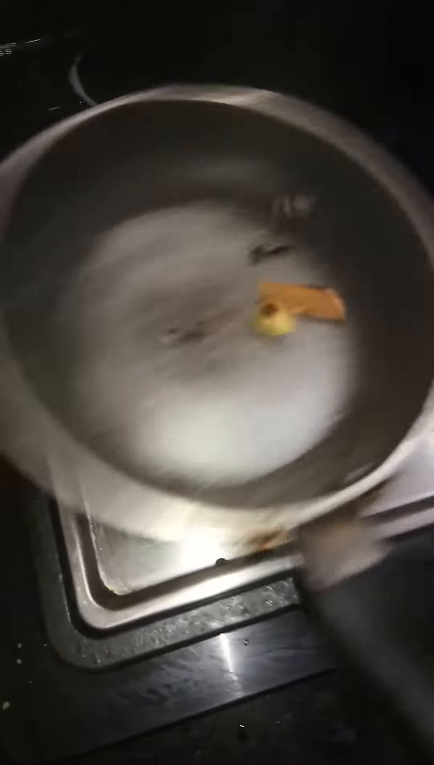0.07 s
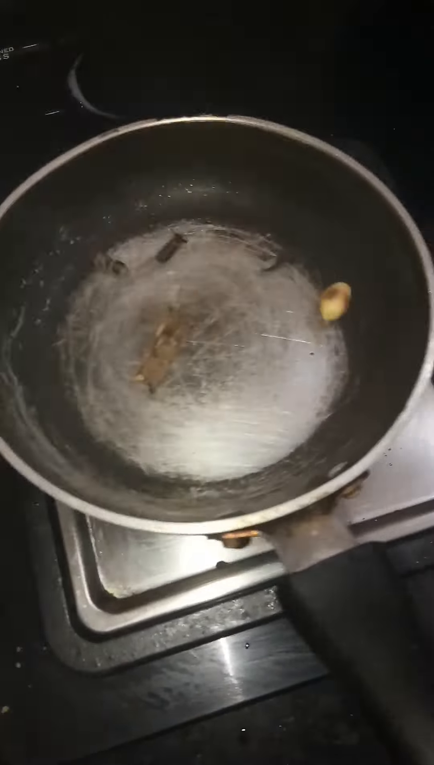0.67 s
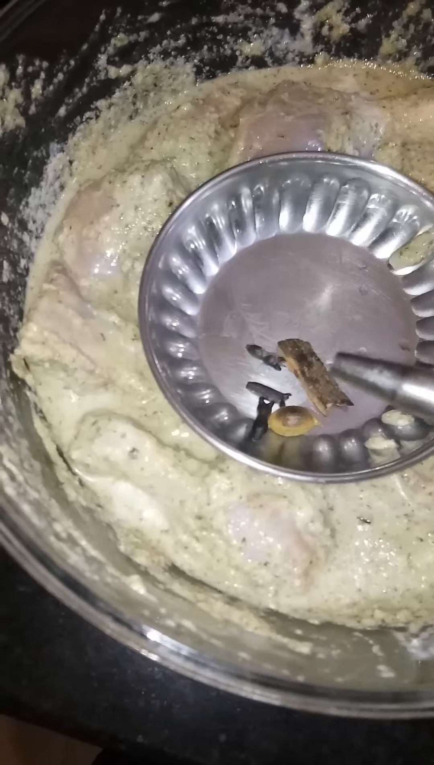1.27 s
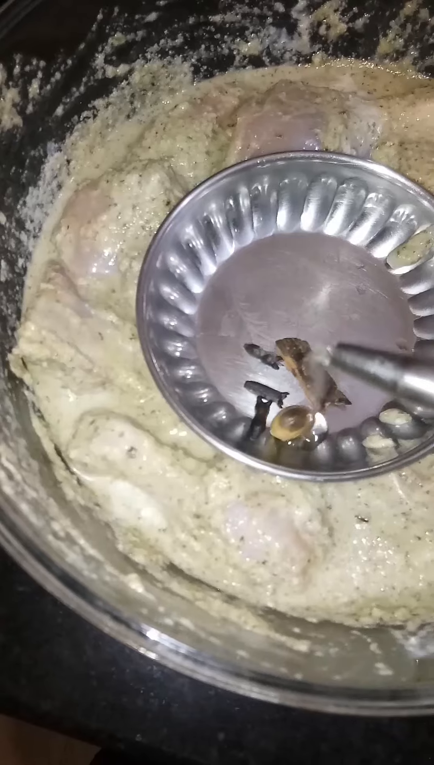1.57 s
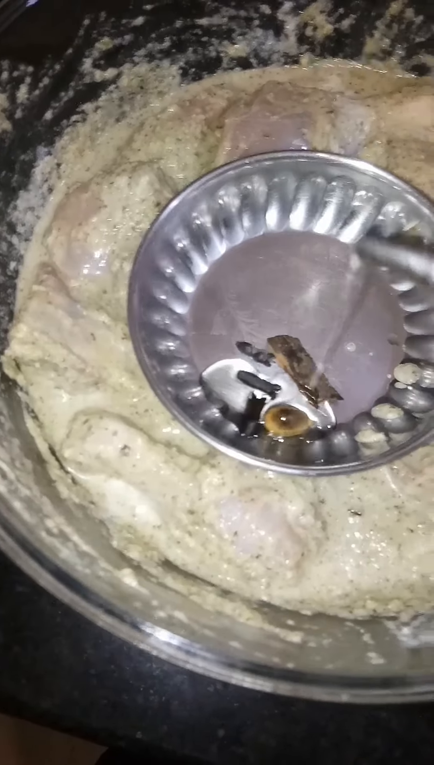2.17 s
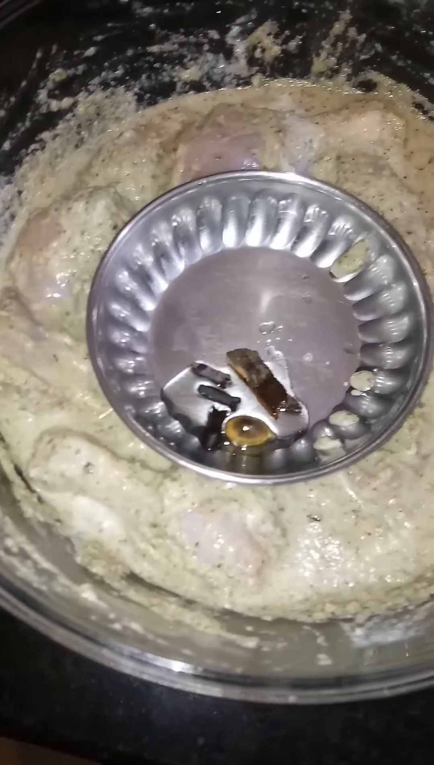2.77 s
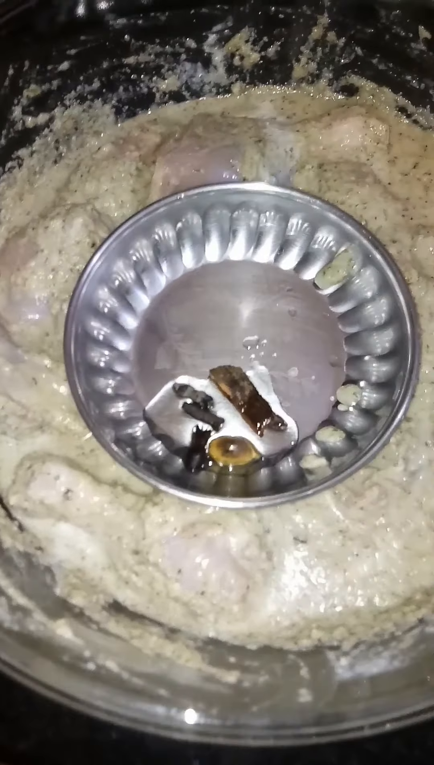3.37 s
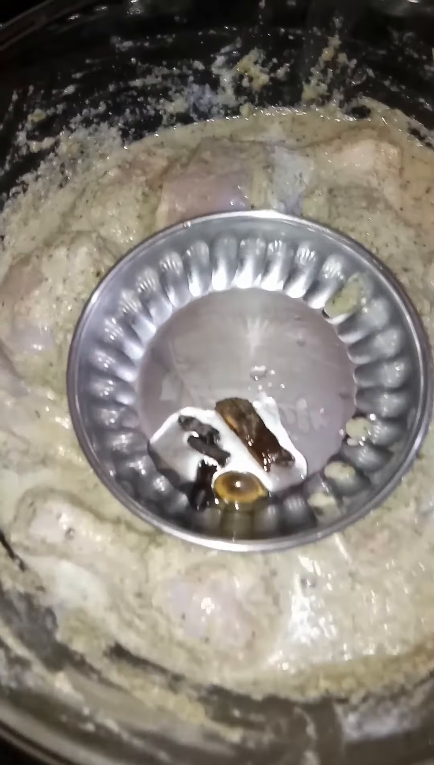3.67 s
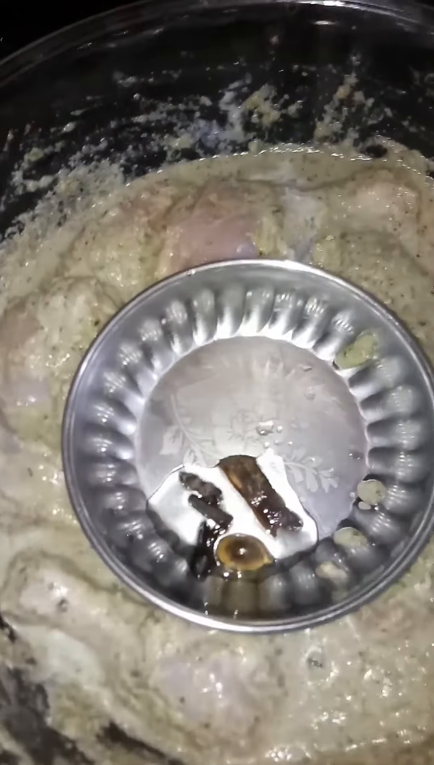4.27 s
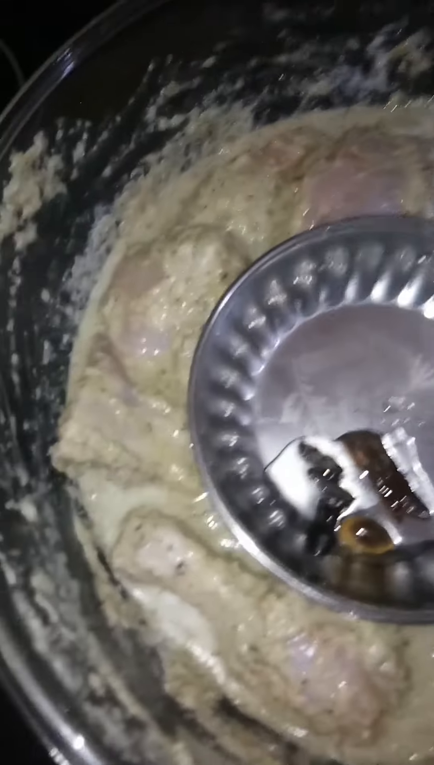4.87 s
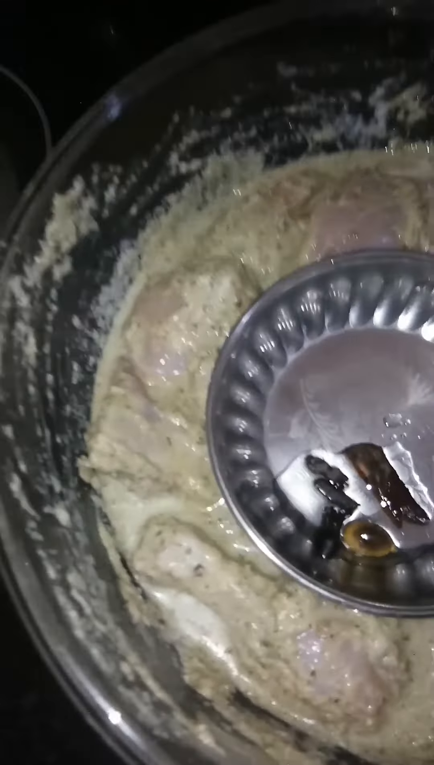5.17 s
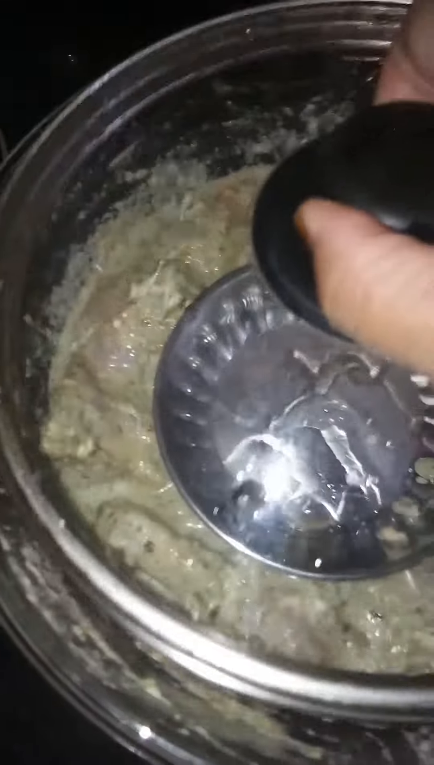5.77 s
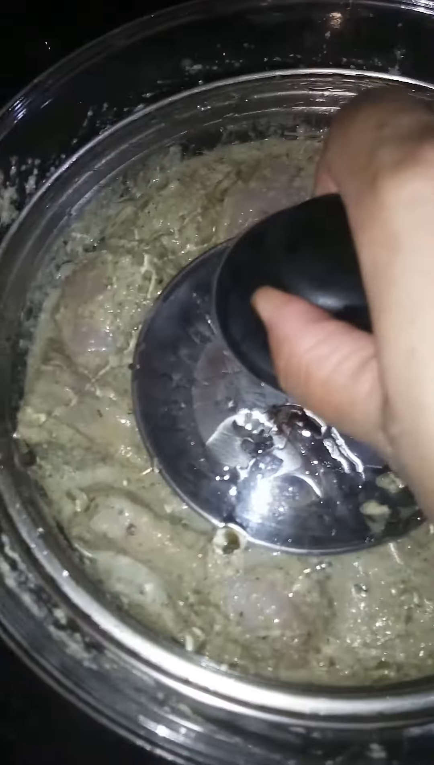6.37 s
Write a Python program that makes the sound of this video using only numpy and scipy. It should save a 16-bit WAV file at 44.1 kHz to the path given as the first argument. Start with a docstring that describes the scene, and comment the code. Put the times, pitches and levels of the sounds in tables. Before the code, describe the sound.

Whole spices tick and skitter in a frying pan, which clanks onto the hob before the sound briefly cuts out. A low, fan-like hum carries on alone until something hard knocks loudly on the counter. A heavy glass bowl clinks and rocks with dull thuds, then a lid is picked up and laid on it with a short clatter. Everything sounds close, in a small kitchen with a short echo.

```python
"""Cookware in a small kitchen

Over a low hum, whole spices tap in a frying pan, which is set on the hob; the sound cuts out briefly.
Something hard is put down on the counter, a heavy glass bowl is shifted, rocks and clinks, and a lid
is picked up and laid on it. Each blow is a dull thud, a clear ring and a faint high shimmer.
The room rings after each, and a limiter holds down the loudest."""
import sys
import numpy as np
from scipy import signal
from scipy.fft import rfft, irfft
from scipy.io import wavfile
from scipy.ndimage import uniform_filter1d, minimum_filter1d

SR = 44100
rng = np.random.default_rng(int(sys.argv[2]) if len(sys.argv) > 2 else 0)


def generate_wav(sig):
    """Save sig (samples, or channels by samples) to the path in sys.argv[1] as 16-bit PCM at SR."""
    pcm = np.round(np.clip(np.atleast_2d(sig).T, -1, 1) * 32767).astype(np.int16)
    wavfile.write(sys.argv[1], SR, pcm)


N = 291942
TIME = np.arange(N) / SR


def amp(db):
    """Decibels to gain."""
    return 10 ** (np.asarray(db) / 20)


def unit(x):
    """Scales to an energy of one."""
    return x / np.sqrt(np.sum(x ** 2) + 1e-20)


def curve(points, hz):
    """Reads a table on a log-frequency axis."""
    f, value = np.transpose(points)
    return np.interp(np.log(hz + 1), np.log(f + 1), value)


def add(mix, s, sound):
    """Mixes a sound in at s seconds."""
    part = mix[max(round(s * SR), 0):][:len(sound)]
    part += sound[:len(part)]


def noise(gain):
    """Steady noise of rms 1, shaped by a gain at each frequency."""
    return np.sqrt(N) * unit(irfft(rfft(rng.standard_normal(N)) * gain, N))


def coloured(x, colour, tilt, size=2048):
    """Minimum-phase EQ, tilted about 1.5 kHz in dB per octave."""
    hz = abs(np.fft.fftfreq(size, 1 / SR))
    gain = amp(curve(colour, hz) + tilt * np.log2((hz + 100) / 1500))
    low_cut = (hz + 1) / np.hypot(hz, 100)
    response = np.exp(np.conj(signal.hilbert(np.log(gain * low_cut))))
    return signal.fftconvolve(x, np.fft.ifft(response).real)[:len(x)]


def decaying_noise(t60_at, size, bands=8):
    """A burst of noise, each band dying at its own speed."""
    t, hz = np.arange(size) / SR, np.fft.rfftfreq(size, 1 / SR)
    spectrum = rfft(rng.choice([-1., 1.], size))
    centres = np.geomspace(125, 16000, bands)
    shares = [curve(np.c_[centres, band], hz) for band in np.eye(bands)]
    return sum(irfft(spectrum * share, size) * np.exp(-np.log(1000) * t / t60_at(f))
               for f, share in zip(centres, shares))


# The drone's resonances. Each row: pitch in Hz, width in Hz, level in dB.
HUM_TONES = [(73.5, 3.2, -49), (100.7, 5.3, -44.5), (86.7, 49, -53), (118.4, 22, -48), (185.5, 20, -60.5),
             (29.3, 18, -64.5)]
# The air's colour. Each row: frequency in Hz, relative level in dB.
AIR_COLOUR = [(82, -38.5), (140, -1.5), (174, -0.5), (254, -10), (349, -5), (508, -8.5), (550, -5.5),
              (939, -8), (1150, -8.5), (1510, -16), (2290, -17.5), (6300, -36.5), (7990, -48),
              (15100, -53.5), (16000, -55)]

def hum(air_db=-46.5):
    """A fan-like bed: narrow, beating low resonances under a soft rush of air."""
    hz = np.fft.rfftfreq(N, 1 / SR)
    drone = sum(amp(db) * noise(1 / (1 + (2 * (hz - f) / width) ** 2)) for f, width, db in HUM_TONES)
    return drone + amp(air_db) * noise(amp(curve(AIR_COLOUR, hz)))


# The room's decay. Each row: frequency in Hz, t60 in seconds.
ROOM_T60 = [(150, 0.56), (500, 0.3), (2000, 0.29), (5000, .34), (12000, 0.16)]

def kitchen_reverb(send, build_s=0.0098, size=26460):
    """Echoes off hard walls build quickly into a short tail."""
    t = np.arange(size) / SR
    build_up = 1 - np.exp(-(t / build_s) ** 2)
    tail = unit(decaying_noise(lambda f: curve(ROOM_T60, f), size) * build_up)
    wall_colour = [(200, 2), (500, 1), (1200, -3), (3000, -9), (8000, -5.5), (15000, -5.5)]
    return signal.fftconvolve(send, coloured(tail, wall_colour, 0))[:N]


def thud(colour, t60, tilt, sharpness, blunt_rise_s=0.00075, size=4096):
    """A contact tick of height sharpness, then dense, short-lived modes; blunt blows swell slower."""
    rise_s = blunt_rise_s * np.exp(-3 * sharpness)
    swell = 1 - np.exp(-np.arange(size) / SR / rise_s)
    contact = unit(decaying_noise(lambda f: t60 * (f / 1000) ** -.15, size) * swell)
    contact[0] += sharpness
    return unit(coloured(contact, colour, tilt))


def ringing(modes, tilt, rise_s=0.00061, size=8192):
    """An object's clear modes swell over the brief contact and ring out."""
    t = np.arange(size) / SR
    hz, db, t60 = np.transpose(modes)[:, :, None]
    waves = np.sin(2 * np.pi * hz * t) * np.exp(-np.log(1000) * t / t60) / np.sqrt(t60)
    gains = amp(db + tilt * np.log2(hz / 2000))
    return unit((gains * waves).sum(0) * (1 - np.exp(-t / rise_s)))


def shimmer_modes(colour, t60=0.05, count=36):
    """Faint high modes, scattered in pitch and loosely following the thud's colour."""
    hz = np.geomspace(2500, 15000, count) * np.exp(rng.uniform(-.02, .02, count))
    db = curve(colour, hz) + 5 * rng.standard_normal(count)
    return np.c_[hz, db, t60 * (hz / 5000) ** -.3]


def struck(blows, modes, colour, thud_t60, ring_db, shimmer_db, thud_send_db, ring_send_db):
    """Thud, ring and shimmer for each blow, on two buses: direct sound and room send."""
    direct, send = np.zeros((2, N))
    high_modes = shimmer_modes(colour)
    for s, db, tilt, ring_trim_db, sharpness in blows:
        ring = amp(ring_db + ring_trim_db) * ringing(modes, tilt)
        ring += amp(shimmer_db + 2 * tilt) * ringing(high_modes, tilt)  # some two octaves up
        add(direct, s, amp(db) * ring)
        add(send, s, amp(db + ring_send_db) * ring)
        add(direct, s, amp(db) * thud(colour, thud_t60, tilt, sharpness))
        # summed over all directions, the dense modes reach the room as a smoother spectrum
        add(send, s, amp(db + thud_send_db) * thud(colour, thud_t60, tilt, sharpness=1.34))
    return np.array([direct, send])


# The slides. Each row: start in seconds, length in seconds, level in dB.
SCRAPES = [(3.968, 0.047, -60), (4.80, 0.065, -60), (5.121, 0.017, -55.5), (5.861, 0.047, -51.5),
           (6.274, 0.03, -65)]
# Their colour. Each row: frequency in Hz, relative level in dB.
SCRAPE_COLOUR = [(500, -30), (2000, -5), (4000, 7), (5500, -3.5), (6400, 7.5), (7300, -9), (11000, -12),
                 (16000, -34)]

def scrapes(send_db=-5):
    """Glass and steel slide on each other in swells of tiny, uneven slips."""
    direct = np.zeros(N)
    for s, length, db in SCRAPES:
        n = int(length * SR)
        slips = rng.standard_normal(n) * amp(5.2 * np.minimum(rng.exponential(1, n), 5))
        swell = np.pad(slips * signal.windows.tukey(n, .5), (0, 2048))
        add(direct, s, amp(db) * np.sqrt(n) * unit(coloured(swell, SCRAPE_COLOUR, tilt=3.1)))
    return np.array([direct, amp(send_db) * direct])


# The biggest taps. Each row: start in seconds, level in dB, tilt in dB per octave.
SPICE_TAPS = [(.0035, -11.5, 3), (.0255, -25.5, 9.5), (.0775, -16, -3), (.143, -22.5, -4.5)]
# The pan's answering ring. Each row: pitch in Hz, level in dB, t60 in seconds.
SPICE_MODES = [(2035, 6.5, 0.09), (2060, -0.5, 0.058), (3660, 0.5, .06), (5530, -15.5, 0.068),
               (6430, -10.5, .13), (8150, -19.5, .1), (10280, -22.5, .09)]
# A tap's colour. Each row: frequency in Hz, level in dB.
SPICE_THUD = [(200, -26), (1500, -15.5), (2150, 12), (2600, 0), (3400, 7), (4400, -8), (7000, -3),
              (10000, -18), (16000, -27.5)]

def spices(skitter_s=(0, .22), count=14):
    """Spices skitter between big taps: light pieces tick brightly; heavy, dull ones ring the pan."""
    weakness, hardness = rng.random((count, 2)).T
    starts = np.interp(np.arange(count) + rng.random(count), [0, count], skitter_s)
    small_taps = np.c_[starts, -25 - 7 * weakness, 4.5 * hardness]
    s, db, tilt = np.r_[SPICE_TAPS, small_taps].T
    ring_trim_db, sharpness = 3 - 0.8 * tilt, np.full(len(s), 0.14)
    return struck(np.c_[s, db, tilt, ring_trim_db, sharpness], SPICE_MODES, SPICE_THUD,
                  thud_t60=.017, ring_db=5.5, shimmer_db=-22, thud_send_db=-8, ring_send_db=-3.5)


# Pan on hob. Each row: start in seconds, level in dB, tilt in dB per octave, ring trim in dB, sharpness.
PAN_BLOWS = [(.256, -10, -1.6, -1, 0.21), (.3875, 1.5, 0.4, 1.5, 0.23), (.415, -8, -5.5, -3, 0.18)]
# Its ring. Each row: pitch in Hz, level in dB, t60 in seconds.
PAN_MODES = [(2055, 9, 0.14), (2150, -2, .04), (2490, -15, .05), (2420, -15.5, .04), (3456, -18.5, 0.14),
             (3610, 5.5, 0.05), (4850, -17.5, 0.14), (5500, -17.5, 0.092), (6180, -7, .09),
             (6270, -15, 0.13), (8130, -28, .08), (8630, -11, 0.059), (10200, -31.5, 0.073)]
# Its thud. Each row: frequency in Hz, level in dB.
PAN_THUD = [(120, -23.5), (400, 5), (750, -3.5), (1500, -2.5), (2300, 4), (3200, -10), (6000, -16),
            (10000, -18), (16000, -32)]

def pan_on_hob():
    """The frying pan clanks as it meets the hob."""
    return struck(PAN_BLOWS, PAN_MODES, PAN_THUD,
                  thud_t60=0.039, ring_db=3, shimmer_db=-10, thud_send_db=0, ring_send_db=-3.5)


# The counter's hits, ring and thud, with columns as for the pan.
COUNTER_BLOWS = [(3.0556, 21, 0, 0, 0.65), (3.0583, 18.6, 0, 1.5, 0.14)]
COUNTER_MODES = [(594, -5, 0.048), (700, -8, 0.043), (1038, 4, 0.061), (1536, -36, 0.06),
                 (1813, -0.5, 0.029), (3030, -9, 0.04), (3380, -15, 0.04), (7200, -15, 0.024)]
COUNTER_THUD = [(120, -9.5), (250, -18), (450, -6.5), (900, 3), (1800, -2), (3500, -6), (5300, -20.5),
                (7200, -18.5), (10000, -25.5), (12800, -34), (15000, -29)]

def counter_knock():
    """Something hard lands on the counter; two contacts fuse into one loud knock."""
    return struck(COUNTER_BLOWS, COUNTER_MODES, COUNTER_THUD,
                  thud_t60=0.025, ring_db=-3, shimmer_db=-10.5, thud_send_db=-1.5, ring_send_db=-13)


# The lifted lid's hits, ring and thud, with columns as for the pan.
LIFT_BLOWS = [(4.8675, 6.5, -1, 0, 0.12), (4.874, -14, -10, 0.5, 0.092), (4.885, -5.5, -2.5, 0, 0.092)]
LIFT_MODES = [(1074, -5.5, 0.06), (1222, -7, 0.12), (1276, -4, 0.097), (1370, -10, 0.07), (1463, -8, 0.077),
              (1905, 0.5, 0.14), (2080, -12, 0.034), (2550, -13, 0.064), (2740, -20, 0.19),
              (4100, -11, 0.021), (4780, -14, 0.031), (6450, -16, 0.024)]
LIFT_THUD = [(150, -17.5), (420, -5), (1250, 2), (2200, -7), (3300, -11.5), (5000, -17), (9000, -29.5),
             (16000, -52)]

def lid_lifted():
    """The lid knocks and rings as it is picked up."""
    return struck(LIFT_BLOWS, LIFT_MODES, LIFT_THUD,
                  thud_t60=0.049, ring_db=3, shimmer_db=-17, thud_send_db=-4.5, ring_send_db=-12.5)


# The landing lid's hits, ring and thud, with columns as for the pan.
LID_BLOWS = [(5.7246, 5, -1.6, 1, 0.63), (5.7605, -2.5, -0.1, -22, 0), (5.772, -2, -2.5, -15, 0.16),
             (5.838, -26, 9.5, -16, .3), (5.894, -15.5, -2.5, 0, 0.9)]
LID_MODES = [(740, -5.5, 0.038), (1138, 3, 0.047), (1220, -4, 0.011), (2680, -19, 0.072), (2790, -9, 0.14),
             (3920, 8.5, 0.0029), (6230, -14.5, 0.032), (7860, -16, 0.035), (11100, -36, 0.039)]
LID_THUD = [(120, -10.5), (230, -6.5), (550, 1), (1200, -4.5), (2000, -7), (2800, -5), (4200, -10),
            (5500, -12.5), (8000, -25), (12000, -31.5), (16000, -49)]

def lid_laid():
    """The lid lands on the bowl and settles with a short clatter."""
    return struck(LID_BLOWS, LID_MODES, LID_THUD,
                  thud_t60=0.082, ring_db=2.5, shimmer_db=-19, thud_send_db=-3.5, ring_send_db=-14)


# The clinks' hits, ring and thud, with columns as for the pan.
CLINK_BLOWS = [(3.746, -6, 0, -1.5, 0.54), (3.845, 2.5, 0, 0, 0.68)]
CLINK_MODES = [(1534, -9.5, .12), (1520, -13, 0.59), (2370, 2, 0.08), (2790, -8.5, 0.071),
               (3570, -7.5, 0.024), (3760, -11, 0.024), (6150, -33, .06), (6280, -20.5, 0.037)]
CLINK_THUD = [(150, -22), (600, 12), (1200, 9), (2000, 1.5), (3800, -25), (5000, -18), (9000, -29),
              (16000, -49)]

def bowl_clinks():
    """Two sharp contacts ring the glass as the bowl is shifted."""
    return struck(CLINK_BLOWS, CLINK_MODES, CLINK_THUD,
                  thud_t60=0.032, ring_db=5.5, shimmer_db=-8, thud_send_db=-4, ring_send_db=-5)


# Landings. Each row: start in seconds, level in dB, tilt in dB per octave, first rebound's loss in dB.
BOWL_LANDINGS = [(3.746, 9, -1.5, 8.5), (3.951, -3.5, -6, 4), (3.979, 0.5, -5.5, 24),
                 (4.0191, 10.5, 0.5, 4), (4.061, 7, -4.5, 12), (4.197, -8.5, -5, 12),
                 (4.824, -9.5, -6.5, 15)]
# The bowl's ring and thud, with columns as for the pan.
BOWL_MODES = [(366.4, -2.5, 0.36), (600, -13, 0.062), (692, -4.5, .07), (895, -8, .06), (1005, -0.5, 0.077),
              (1093, 4.5, 0.072), (1300, -3, 0.037), (3295, -12, 0.027), (6200, -23, 0.08),
              (6050, -26, 0.09), (7000, -33, .1), (7550, -36, .15), (8450, -42, 0.081), (12900, -36, 0.074)]
BOWL_THUD = [(120, -17.5), (250, -11.5), (350, -2), (700, 5.5), (1200, 0.5), (2000, -10.5), (4000, -27),
             (5000, -37), (6300, -25.5), (10000, -45.5), (16000, -51)]

def bowl_rocking(rebound_s=.051, dulling=0.24, sharpness=.17):
    """The heavy bowl rocks on its base; rebounds fade ever faster, each duller and ringing less."""
    blows = []
    for s, db, landing_tilt, loss_db in BOWL_LANDINGS:
        for bounce in range(3):
            lost_db = loss_db * bounce ** 2
            if lost_db > 30:
                break
            tilt = landing_tilt - dulling * lost_db
            ring_trim_db = 2 + 2.2 * tilt
            blows.append((s + bounce * rebound_s, db - lost_db, tilt, ring_trim_db, sharpness))
    return struck(blows, BOWL_MODES, BOWL_THUD,
                  thud_t60=0.081, ring_db=-4.5, shimmer_db=-14, thud_send_db=-5.5, ring_send_db=-3)


def scene():
    """Cookware and its reverb over the hum, in mono."""
    direct, send = (spices() + pan_on_hob() + counter_knock() + bowl_rocking() + bowl_clinks()
                    + lid_lifted() + lid_laid() + scrapes())
    return (direct + kitchen_reverb(send) + hum())[None]


def record(dry, ceiling_db=-3, recovery_db_per_s=125, mute_s=(.469, .787), cutoff_hz=15800):
    """The microphone port's treble resonance, a peak limiter, a brief mute and a low-pass."""
    port_ring = signal.lfilter(*signal.iirpeak(15000, Q=23, fs=SR), dry)
    heard = dry + amp(3) * port_ring
    over_db = np.maximum(20 * np.log10(abs(heard[0]) + 1e-9) - ceiling_db, 0)
    recovery = TIME * recovery_db_per_s
    held_db = np.maximum.accumulate(over_db + recovery) - recovery
    gain_db = uniform_filter1d(minimum_filter1d(-held_db, size=45), size=45)  # 1 ms look-ahead
    gate = (TIME < mute_s[0]) | (TIME > mute_s[1])
    low_pass = signal.firwin(255, cutoff_hz, window=("kaiser", 9), fs=SR)
    return signal.oaconvolve(heard * amp(gain_db) * gate, low_pass[None], "same")


dry = scene()
out = record(dry)
generate_wav(out)
```